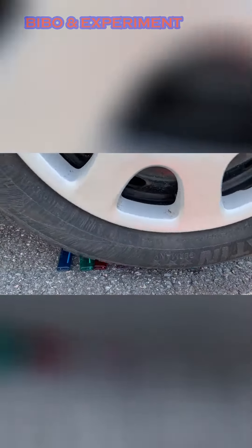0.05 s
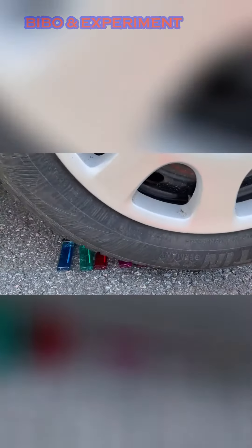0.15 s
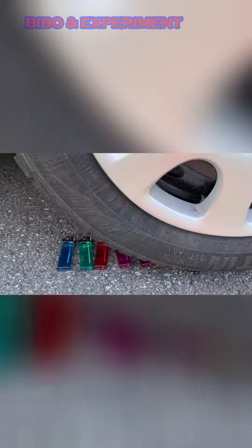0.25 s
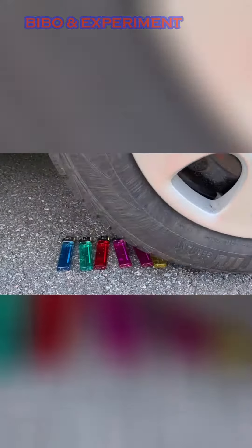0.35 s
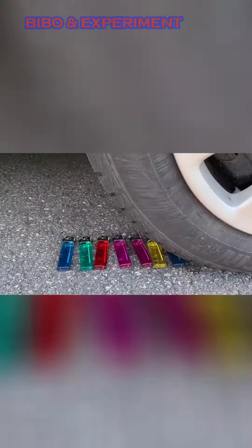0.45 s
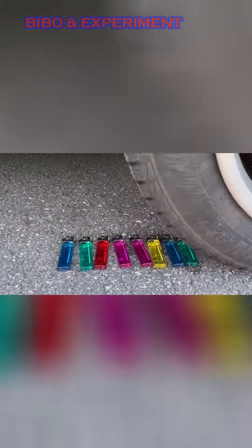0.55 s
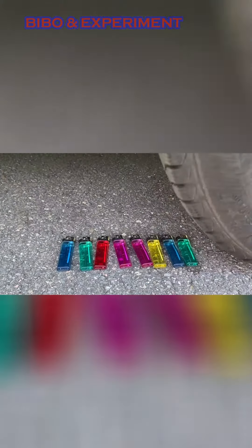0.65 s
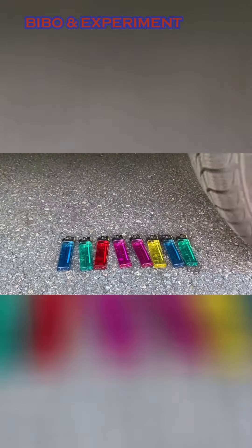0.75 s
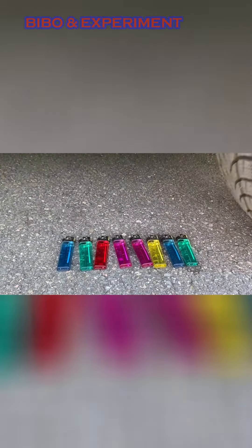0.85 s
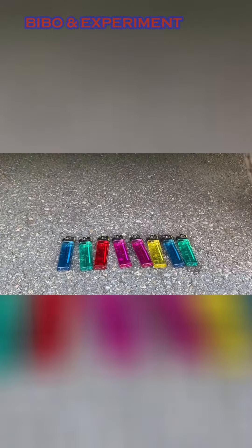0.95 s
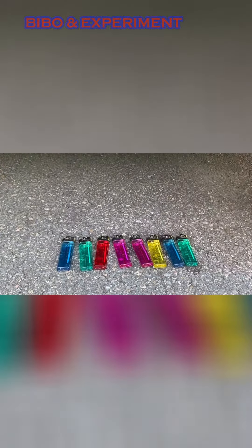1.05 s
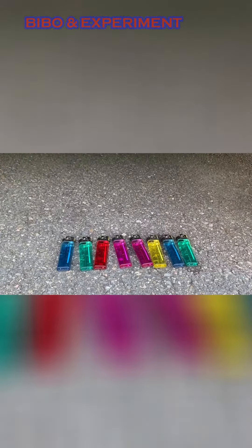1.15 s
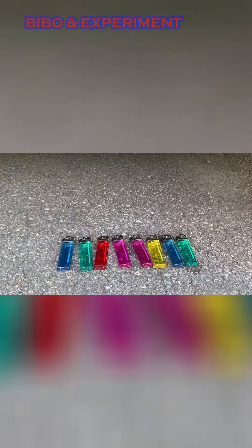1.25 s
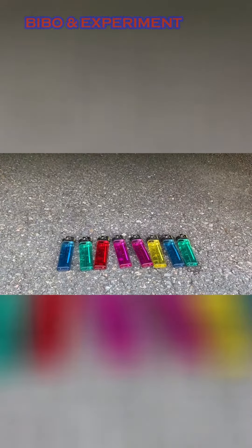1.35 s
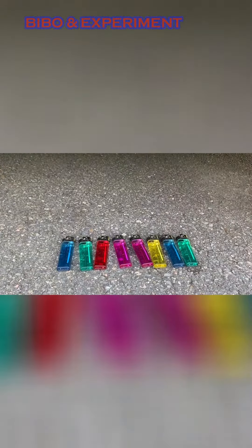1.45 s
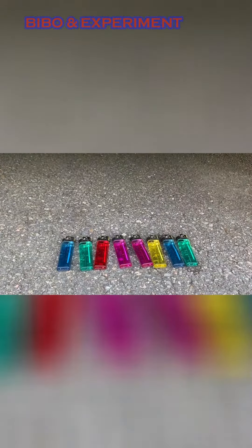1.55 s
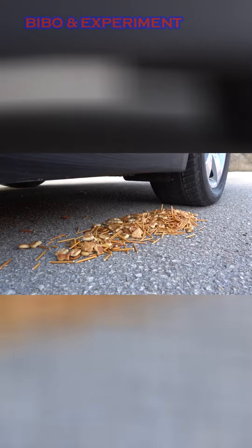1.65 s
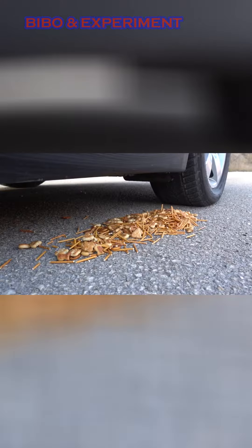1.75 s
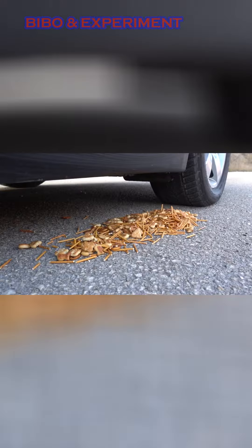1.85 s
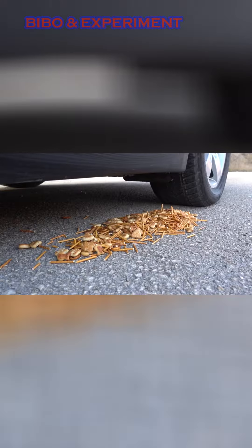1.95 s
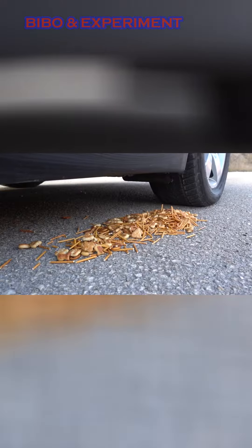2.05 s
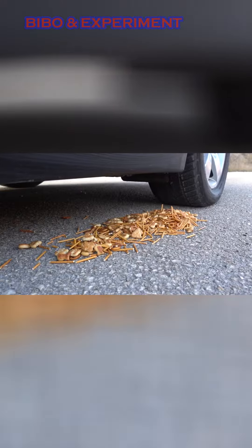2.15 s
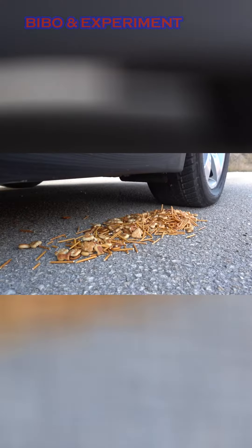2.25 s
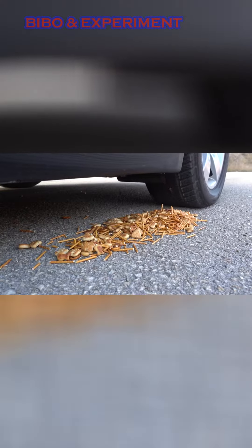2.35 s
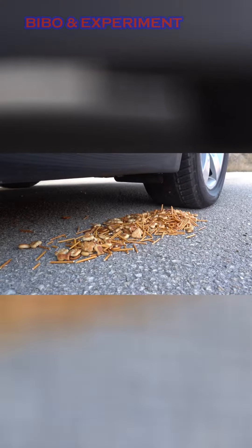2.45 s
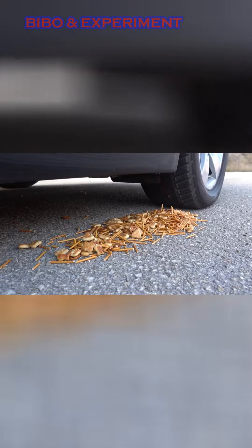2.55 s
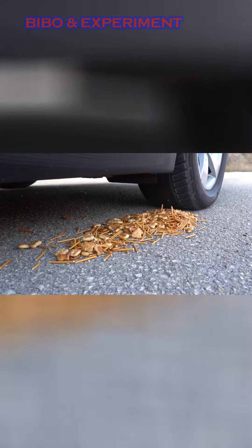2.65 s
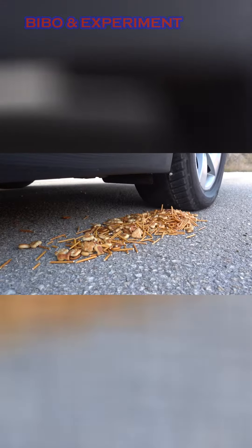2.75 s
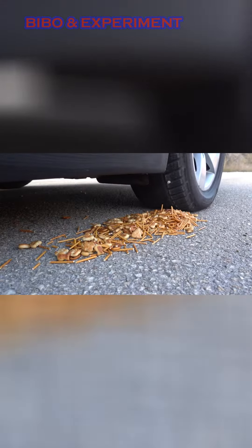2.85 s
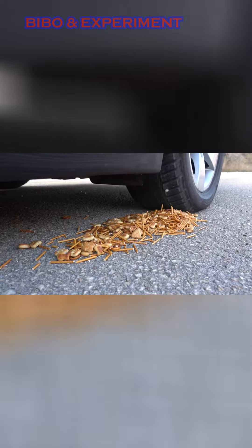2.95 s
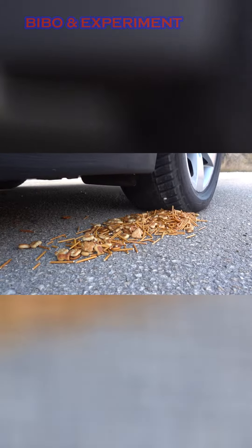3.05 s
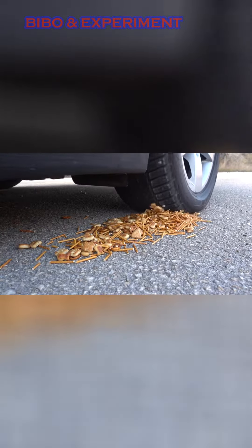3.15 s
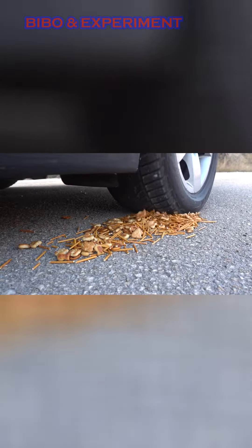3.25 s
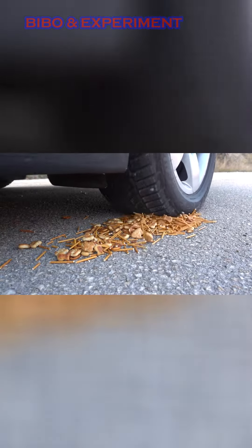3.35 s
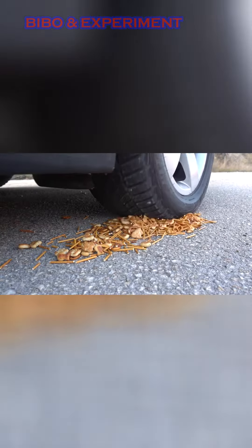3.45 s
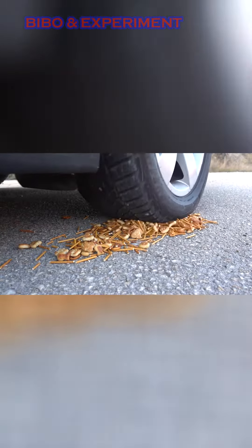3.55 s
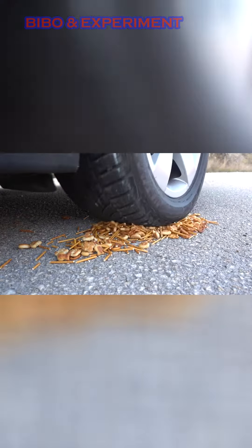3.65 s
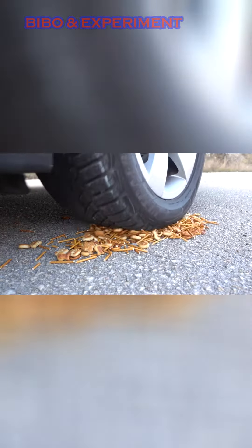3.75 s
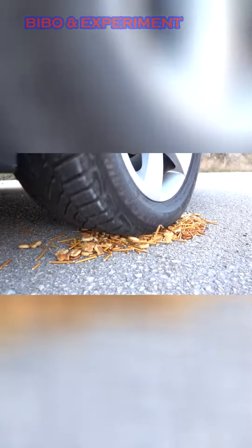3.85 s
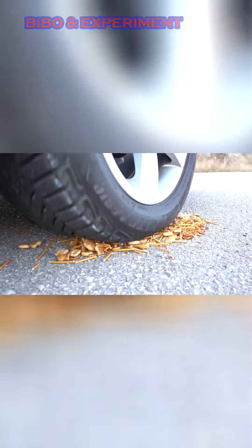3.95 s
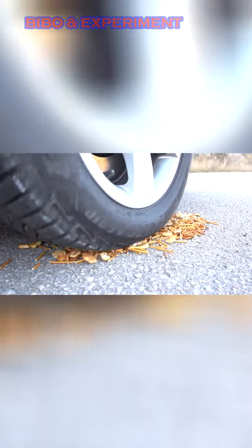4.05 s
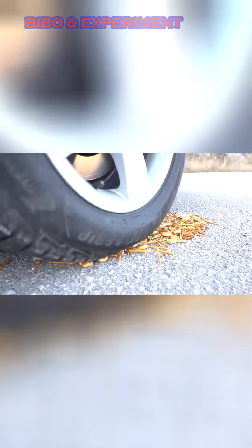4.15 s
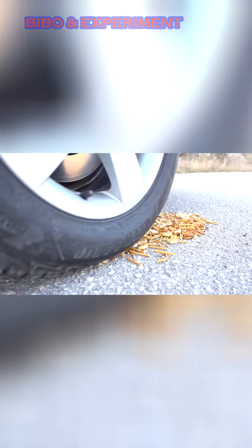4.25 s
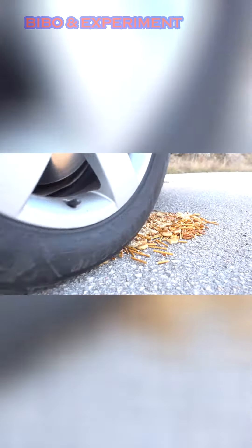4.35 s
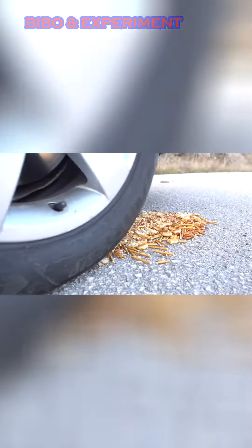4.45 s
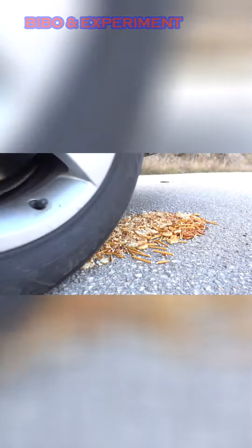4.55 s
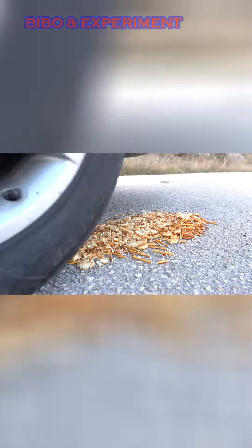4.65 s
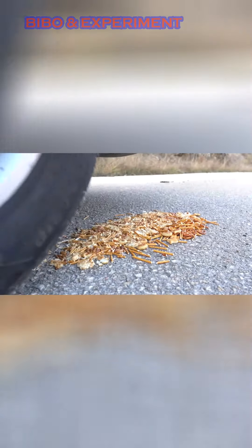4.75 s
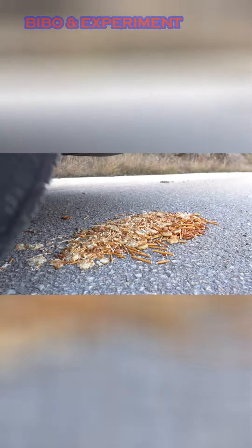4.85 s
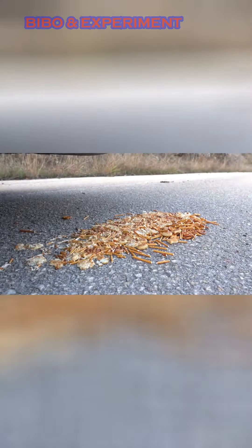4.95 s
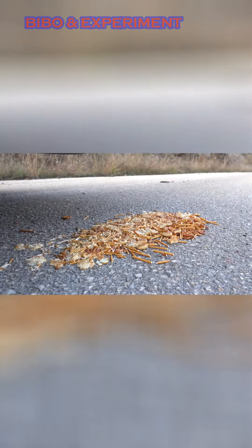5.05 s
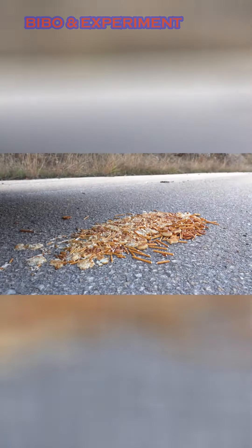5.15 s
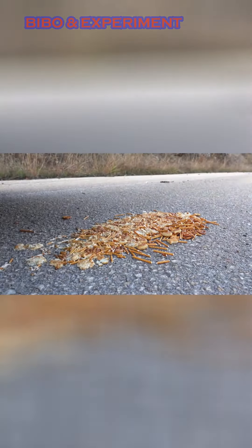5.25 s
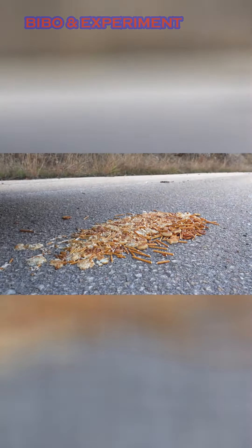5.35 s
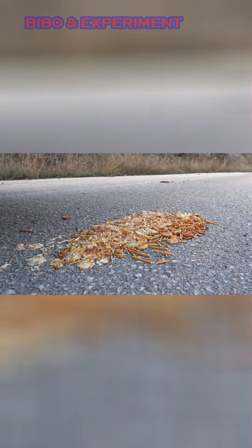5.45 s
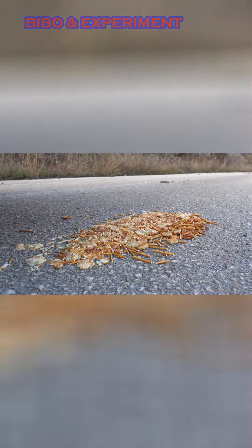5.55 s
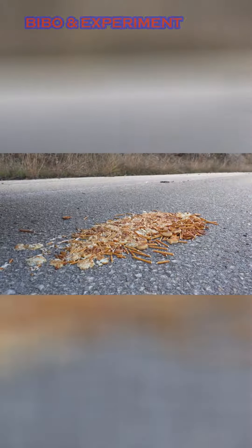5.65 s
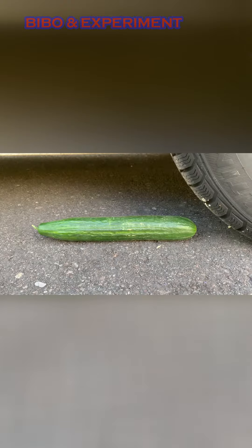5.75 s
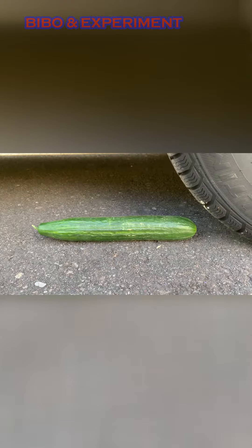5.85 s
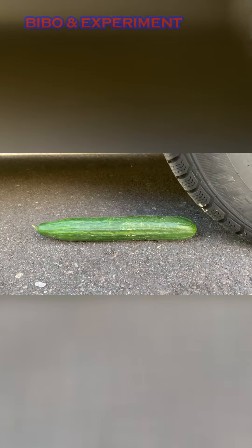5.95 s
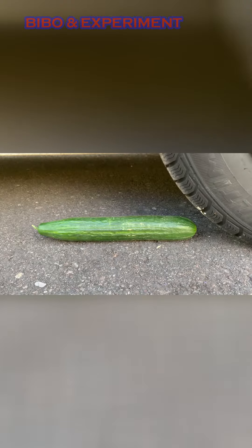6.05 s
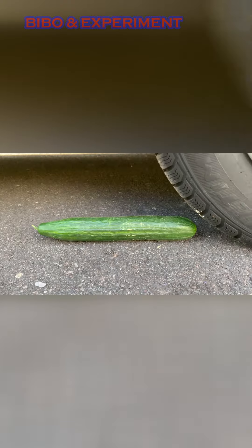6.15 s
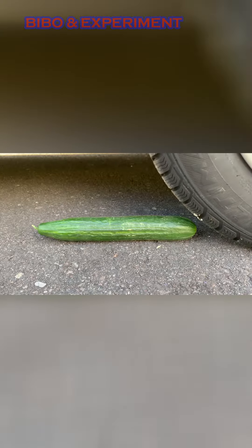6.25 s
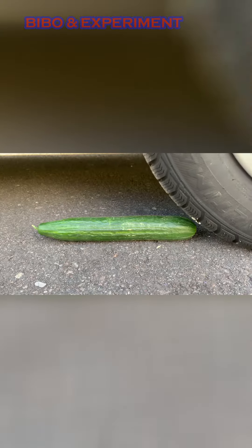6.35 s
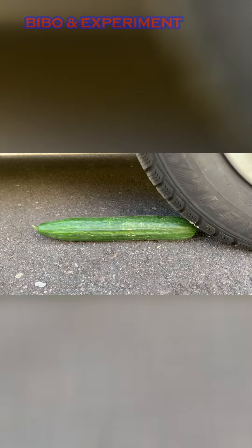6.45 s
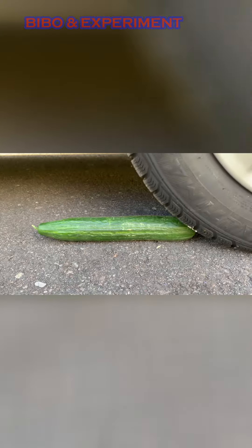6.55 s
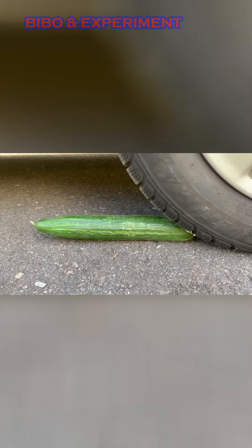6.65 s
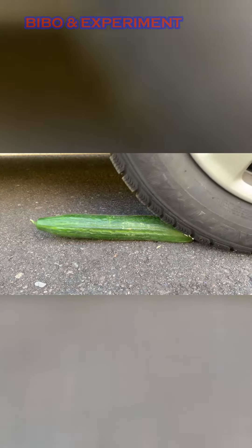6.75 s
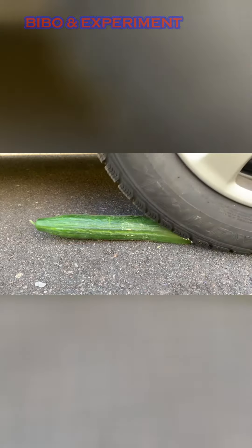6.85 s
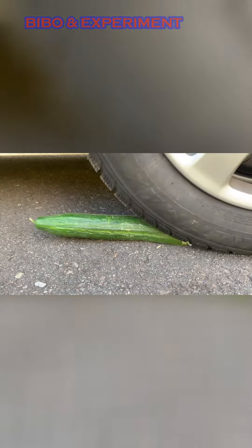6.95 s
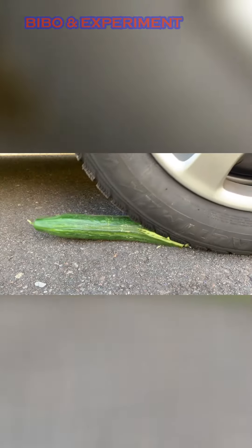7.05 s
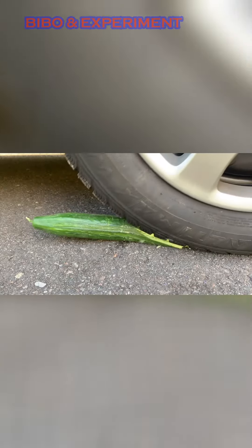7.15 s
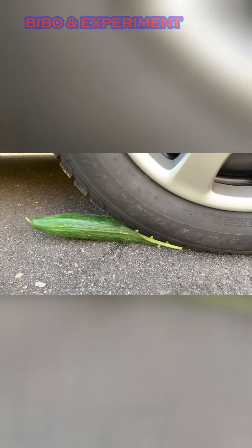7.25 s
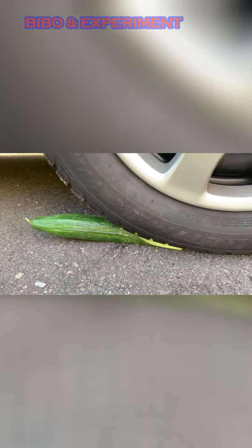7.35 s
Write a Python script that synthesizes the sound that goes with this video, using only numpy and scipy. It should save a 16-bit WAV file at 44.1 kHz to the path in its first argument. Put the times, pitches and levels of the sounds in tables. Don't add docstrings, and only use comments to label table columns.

```python
import sys
import numpy as np
from scipy import signal
from scipy.io import wavfile
from scipy.ndimage import uniform_filter1d

SR = 44100
rng = np.random.default_rng(int(sys.argv[2]) if len(sys.argv) > 2 else 0)


def to_linear_factor(level_db):
    exponent = np.asarray(level_db, float) / 20
    return 10 ** exponent


def inscribe(sig):
    pcm = np.round(np.clip(np.atleast_2d(sig).T, -1, 1) * 32767)
    wavfile.write(sys.argv[1], SR, pcm.astype(np.int16))


N = 325899

# start t/s, end t/s
LIGHTERS_SPAN = (0, 1.622)
SNACKS_SPAN = (1.655, 5.742)
CUCUMBER_SPAN = (5.771, 7.39)
BAND_EDGES_HZ = (30, 350, 2500, 16000)
# t/s, left minus right/dB
BALANCE = [(0.0, 3), (2.12, 2), (2.98, -2), (5.39, 3), (6.01, -0.5), (7.39, 0)]

# t/s, third firing multiple f/Hz, its level/dB, strain/dB
LIGHTERS_IDLE = [
    (0.0, 74.8, -31.5, 0),
    (0.054, 74.7, -33, -2),
    (1.606, 74.6, -32.5, -2),
    (1.62, 74.6, -32.5, -8),
]
CUCUMBER_IDLE = [(5.77, 74.4, -43.5, -10), (5.95, 74.26, -42, -4.5), (6.2, 74.7, -38.5, 3),
                 (6.4, 71.33, -42, -15), (6.6, 72.34, -39.5, -8), (6.75, 71.45, -45, -1),
                 (7.0, 72.1, -41, -1), (7.2, 71.6, -44, 9), (7.39, 72.4, -41, 5)]
# multiple of firing rate, level re third multiple/dB
LIGHTERS_TONES = [(1, -43), (2, -31), (4.35, -15), (5, -32), (7.6, -16.5), (10.2, -22.5), (15.2, -24.5),
                  (17.8, -22), (31, -25.5)]
CUCUMBER_TONES = [(1, -7), (2, -20), (4, -30), (5, 0.5), (6, 2.5), (7, -12), (8, -31), (9, -7.5),
                  (18, -12.5), (22, -20.5), (23, -11.5), (24, -9.5), (30.5, -17.5)]
STRAIN_SHARE = {5: 0.28, 6: 0.72}

# t/s, level/dB
LIGHTERS_BAY = [(0.0, -41), (1.448, -38), (1.62, -38)]
CUCUMBER_BAY = [(5.77, -43.5), (7.39, -44)]
CREEP_LEVEL = [
    (1.655, -62),
    (1.949, -62.5),
    (2.9, -51.5),
]
CRUNCH_LEVEL = [(2.89, -73), (2.898, -41), (3.02, -30.5), (3.07, -24), (3.2, -23.5), (3.35, -20.5),
                (3.5, -20), (4.2, -20), (4.38, -24), (4.415, -33), (4.46, -65)]
ROLL_LEVEL = [(4.4, -42), (4.62, -44), (5.568, -44), (5.74, -44)]
JUICE_LEVEL = [(6.52, -70), (6.62, -49), (6.72, -51), (6.8, -49), (6.92, -41.5), (6.99, -45), (7.02, -40.5),
               (7.05, -45.5), (7.39, -49.5)]
# rumble at loudest/dB, share followed, hiss at loudest/dB, share followed
LIGHTERS_BAY_LAW = (-37, 1.2, -47, 0.5)
CUCUMBER_BAY_LAW = (-37.5, 1, -62, 3.5)
CREEP_LAW = (-56, 0.2, -61.5, 0.26)
CRUNCH_LAW = (-31, 0.7, -24.5, 1.0)
ROLL_LAW = (-51, -1, -46, 1.25)
JUICE_LAW = (-49, -0.3, -43, 2.04)
# f/Hz, density/dB
LIGHTERS_BAY_COLOUR = [(18, -49), (30, -20), (77, -21.5), (137, -23.5), (187, -19.5), (299, -27.5),
                       (432, -19), (591, -21.5), (767, -21), (1590, -31.5), (2910, -28.5), (7080, -39.5),
                       (9190, -45.5), (10700, -38), (15500, -55)]
CUCUMBER_BAY_COLOUR = [(30, -25), (140, -4.5), (225, -21), (300, -26), (450, -23.5), (570, -18.5),
                       (655, -32), (750, -33.5), (1250, -34.5), (1450, -46), (3510, -48), (5250, -67),
                       (6100, -59), (7270, -60), (8660, -46.5), (12000, -67.5)]
CREEP_COLOUR = [(18, -41), (30, -16), (91, -7), (165, -15), (567, 2), (822, -6.5), (1380, -7),
                (11000, -21.5), (14300, -59), (22000, -120)]
SCUFF_COLOUR = [(18, -51), (30, -33), (140, 0.5), (181, -28), (258, -4), (311, -15.5), (954, -29.5),
                (8000, -75), (10400, -99), (17600, -120)]
CRUNCH_COLOUR = [(18, -59), (30, -44), (81, -4), (178, -9), (233, 2.5), (364, -8.5), (477, -4), (745, -5),
                 (1720, -12), (2100, -13.5), (5370, -22), (7780, -21), (11000, -24), (14300, -60),
                 (22000, -120)]
ROLL_COLOUR = [(18, -47), (30, -13), (81, -3.5), (182, -8.5), (233, -6), (412, -13), (709, -10), (842, -12),
               (2970, -17), (5370, -27), (11000, -31), (14300, -61), (22000, -120)]
JUICE_COLOUR = [(100, 21), (800, 4.5), (1700, -2), (3500, -4.5), (7000, -14), (8700, -6.5), (12000, -21),
                (15500, -22)]
# f/Hz, correlation
LIGHTERS_LIKENESS = [(60, 0.99), (180, 0.88), (550, -0.35), (1650, -0.23), (4970, 0.48), (15000, -0.19)]
CUCUMBER_LIKENESS = [(60, 0.32), (180, 0.68), (550, 0.55), (1650, -0.13), (4970, 0.43), (15000, -0.49)]
ROAD_LIKENESS = [(60, 1.0), (180, 1), (550, 0.94), (1650, 0.21), (4970, -0.48), (15000, -0.00095)]
CRUNCH_LIKENESS = [(60, 0.93), (180, 1), (550, 0.97), (1650, 0.85), (4970, 0.54), (15000, 0.12)]

# t/s, peak/dB, ring f/Hz, tick/dB, thump/dB
LIGHTER_TICKS = [
    (0.001, -27.5, 1130, 5.5, -8),
    (0.221, -42, 1180, -13, -12),
    (0.249, -32, 1060, 7, -30),
    (0.4718, -8.5, 840, -12.5, -9),
]
# start t/s, length/s, level/dB, rumble re level/dB
SLIPS = [
    (1.834, 0.27, -53, 13),
    (1.946, 0.081, -41.5, 12.5),
    (2.101, 0.064, -41, -7),
    (2.256, 0.042, -41, -4.5),
]
# t/s, peak/dB, ring f/Hz, tick/dB
PEBBLES = [(1.772, -47, 2560, -32), (1.3, -46, 3000, -32), (2.8, -47, 2600, -32), (2.7, -35, 2700, -28),
           (2.3306, -43, 1900, -32), (2.4309, -47, 2150, -32), (2.455, -50, 1700, -32),
           (2.493, -49, 2300, -32), (2.5097, -39, 2330, -24), (2.9, -46, 2290, -32),
           (2.6155, -31, 1910, -13), (2.4, -43.5, 2040, -32), (1.7, -49, 1780, -32), (1.4, -38, 1830, -32),
           (4, -34, 2230, -32), (2, -43, 2170, -32), (2.7462, -40, 2710, -32), (3.3, -40, 1900, -28.5),
           (2.805, -53, 1600, -32), (2.842, -47, 1460, -32)]
# t/s, peak/dB, ring f/Hz
STICK_SNAPS = [(2.899, -33, 480), (2.928, -34, 520), (2.95, -18.5, 570), (2.99, -24, 703),
               (3.012, -13, 835), (3.032, -10, 977), (3.062, -14, 760), (3.079, -19, 993),
               (3.079, -6.5, 655), (3.097, -7, 610), (3.126, -6, 790), (3.157, -5, 750), (3.176, -7, 720),
               (3.208, -13, 655), (3.222, -5.5, 800), (3.231, -8.5, 440), (3.261, -24, 401),
               (3.261, -11, 969), (3.276, -11, 454), (3.308, -18, 689), (3.332, -10, 1040),
               (3.361, -9, 457), (3.383, -13, 1410), (3.396, -11, 505), (3.428, -13, 545), (3.448, -8, 484),
               (3.492, -11, 805), (3.517, -7, 704), (3.534, -12, 872), (3.552, -14.5, 980),
               (3.569, -11, 1450), (3.58, -9, 826), (3.601, -10.5, 517), (3.615, -7.5, 530),
               (3.624, -10, 1160), (3.639, -10, 487),
               (3.659, -9, 754), (3.677, -10.5, 861), (3.703, -16, 1300), (3.731, -13.5, 743),
              (3.74, -12, 764), (3.789, -15.5, 790), (3.799, -11, 720), (3.837, -10, 1040),
              (3.868, -5, 1150), (3.883, -9, 1110), (3.901, -7, 970), (3.92, -16, 755), (3.94, -6, 1210),
              (3.958, -9, 790), (3.989, -10, 738), (4.025, -7, 856), (4.059, -12, 674), (4.074, -16, 816),
              (4.089, -13, 660), (4.122, -12, 851), (4.122, -8, 571), (4.148, -9.5, 1040),
              (4.168, -10, 1170), (4.202, -15, 650), (4.211, -14.5, 720), (4.221, -14, 555),
              (4.24, -14, 541), (4.271, -8, 620), (4.307, -8.5, 1320), (4.336, -10, 1010),
              (4.349, -10, 640), (4.377, -14, 608)]
# t/s, peak/dB
CRISPS = [(2.9503, -25), (3.0122, -24), (3.0316, -18), (3.0636, -23), (3.103, -8), (3.1614, -7.5),
          (3.2252, -26), (3.2786, -8.5), (3.3255, -20), (3.3978, -19), (3.5126, -8), (3.5714, -13),
          (3.662, -14), (3.7071, -9), (3.776, -8), (3.8308, -6.5), (3.9196, -21), (3.9371, -8), (3.977, -9),
          (4.1516, -29), (4.2494, -20), (4.2793, -25), (4.338, -22), (4.395, -21), (4.4384, -33)]
# t/s, peak/dB, ring f/Hz, tick/dB, thump/dB
GRIT = [(4.442, -24, 1870, -13, -10), (4.4745, -9.5, 1690, 0.5, -15.5), (4.499, -20, 1300, -30, -22),
        (4.521, -26, 2200, -22, -22), (4.5265, -24.5, 1500, -27, -7), (4.5725, -14.5, 1750, -35, -25),
        (4.6545, -25, 1340, -7, -21), (4.66, -22.5, 1360, -30, -11), (4.8885, -25, 1440, -25, 0),
        (4.8945, -21.5, 1510, -40, -7), (4.9025, -28, 2600, -25, -21), (5.12, -31, 1100, -20, -17),
        (5.1505, -26.5, 1510, -22, -5), (5.188, -25, 1500, -14, -12), (5.4025, -26.5, 2560, -20, -26),
        (5.454, -25, 1700, -20, -15), (5.5485, -29, 1380, -23, -10), (5.5655, -35, 1280, -13.5, 8),
        (5.5935, -7.5, 1820, -30, -18.5), (5.5975, -17.5, 1900, -28, -21), (5.686, -25.5, 1850, -25, -22),
        (5.7215, -23.5, 1700, -24, -20)]
# t/s, peak/dB, ring f/Hz, tick/dB, thump/dB
SPLITS = [(5.963, -39, 2600, -20, -5), (6.18, -32, 597, -30, -2), (6.6748, -40, 1560, -18, 12.5),
          (6.7575, -26, 2016, -20, -4), (6.776, -14, 1450, -15.5, 1), (6.8418, -18.5, 970, 0, 4.5),
          (6.8815, -2, 1520, -19, -5), (6.9071, -17, 1588, -27, -9), (6.9358, -6.5, 1350, -16, -1),
          (6.9421, -12, 1560, -19, -16), (6.9621, -23.5, 1994, -3, -17), (6.9812, -10.5, 2000, -24, -8.5),
          (6.985, -10.5, 1900, -21, -11), (7.001, -17.5, 1610, -12, -9), (7.0142, -23, 1690, 5, -5),
          (7.1205, -28.5, 1690, -9, -7), (7.1711, -23, 1551, -17, -19), (7.3297, -22, 1200, -12.5, -5.5),
          (7.3508, -27, 1897, -31, -7)]
# t/s, f/Hz, level/dB
SQUEAK = [
    (7.02, 2100, -62),
    (7.069, 1950, -49),
    (7.149, 1709, -52),
    (7.21, 1540, -42),
    (7.25, 1500, -66),
]
# f/Hz, width/Hz, level/dB
PORT = [(8410, 350, 11.5), (6070, 764, 4)]
# start t/s, end t/s, low f/Hz, high f/Hz, share of time
MUTED_BANDS = [(0, 1.63, 8300, 9600, .6), (0, 1.63, 12400, 14200, .92), (0, 1.63, 14200, 15600, .55),
               (5.76, 7.39, 6800, 7800, .6), (5.76, 6.75, 4600, 5650, .3), (5.76, 7.39, 10000, 11700, .4),
               (5.76, 7.39, 11700, 15600, .82)]


def read(points, hz):
    f, value = np.transpose(points)
    return np.interp(np.log(hz + 1), np.log(f + 1), value)


def evened(x):
    return x / np.sqrt(np.mean(x ** 2) + 1e-20)


def add(mix, start_s, sound):
    part = mix[:, round(start_s * SR):][:, :sound.shape[1]]
    part += sound[:, :part.shape[1]]


def drift(n, hz):
    low_pass = signal.butter(2, hz, fs=SR, output="sos")
    return evened(signal.sosfilt(low_pass, rng.standard_normal(n + 9000))[9000:])


def band_noise(shape, low_hz, high_hz, order):
    band = signal.butter(order, [low_hz, high_hz], "band", fs=SR, output="sos")
    return signal.sosfilt(band, rng.standard_normal(shape))


def below(x, hz):
    return signal.oaconvolve(x, signal.firwin(301, hz, window=("kaiser", 7), fs=SR)[None], "same")


def resonance(x, hz, width_hz):
    return signal.lfilter(*signal.iirpeak(hz, hz / width_hz, fs=SR), x)


def spread(pan_db):
    return to_linear_factor(pan_db * np.c_[[.5, -.5]])


def follow(control, law, rumble_db=0):
    s, db = np.transpose(control)
    low_db, low_share, high_db, high_share = law
    dip_db = db - db.max()
    return np.c_[s, low_db + low_share * dip_db + rumble_db, db, high_db + high_share * dip_db]


def grains(n, per_s, spread_db, cycles, shared):
    clumps = np.exp(.45 * drift(n, 60))

    def sizes():
        size_db = spread_db * np.minimum(rng.exponential(1, n), 3.2)
        return to_linear_factor(size_db) * (rng.random(n) < per_s * clumps / SR)

    together, out = sizes(), np.zeros((2, n))
    t = np.arange(1500) / SR
    for hz in np.geomspace(150, 12000, 12):
        train = shared * together * rng.standard_normal(n) + sizes() * rng.choice([-1, 1], n)
        t60_s = cycles / hz + 0.00027
        bit = np.sin(2 * np.pi * hz * t) * to_linear_factor(-60 * t / t60_s)
        second_path = bit * np.cos(t * hz * 4.2 + 0.13)
        out[0] += evened(signal.oaconvolve(train, bit)[:n])
        out[1] += evened(signal.oaconvolve(train, second_path)[:n])
    return out


def texture(rows, colour, likeness, grit=None, grit_share=0., patchy_db=1.5):
    s, *levels_db = np.transpose(rows)
    n = round((s[-1] - s[0]) * SR)
    frame = dict(fs=SR, nperseg=1024, noverlap=768)
    hz, t, z = signal.stft(rng.standard_normal((2, n)), **frame)
    if grit is not None:
        bits = signal.stft(grains(n, *grit), **frame)[2]
        bits_power = uniform_filter1d((abs(bits) ** 2).mean(2), 9, 1)
        bits = bits / np.sqrt(bits_power / (abs(z) ** 2).mean())[..., None]
        z = np.sqrt(grit_share) * bits + np.sqrt(1 - grit_share) * z
    shape_db = read(colour, hz)
    field_db = np.zeros(z.shape[1:])
    for low, high, level_db in zip(BAND_EDGES_HZ, BAND_EDGES_HZ[1:], levels_db):
        band = (hz >= low) & (hz < high)
        band_db = 10 * np.log10((to_linear_factor(shape_db[band]) ** 2).sum() / len(hz))
        field_db[band] = np.interp(t + s[0], s, level_db) - band_db
    field_db[hz < BAND_EDGES_HZ[0]] = field_db[1]
    field_db[hz >= BAND_EDGES_HZ[-1]] = field_db[370]
    patches = uniform_filter1d(uniform_filter1d(rng.standard_normal(field_db.shape), 10, 0), 10, 1)
    field_db = uniform_filter1d(field_db, 5, 0) + shape_db[:, None] + patchy_db * evened(patches)
    turn = np.arccos(np.clip(read(likeness, hz), -1, 1))[:, None] / 2
    middle, side = np.cos(turn) * z[0], np.sin(turn) * z[1]
    pair = np.array([middle + side, middle - side])
    sound = signal.istft(pair * to_linear_factor(field_db), **frame)[1][:, :n]
    return s[0], sound * spread(np.interp(s[0] + np.arange(n) / SR, *np.transpose(BALANCE)))


def engine(idle, tones, bay, wobble_db, jitter, throb, lag_turns, left_late_turns):
    start, noise = bay
    n = noise.shape[1]
    t = start + np.arange(n) / SR
    s, third_hz, level_db, strain_db = np.transpose(idle)
    firing_hz = np.interp(t, s, third_hz) / 3 * (1 + jitter * drift(n, 7.9))
    turns = np.cumsum(firing_hz) / SR
    heard = turns - np.c_[[left_late_turns, 0]]
    exhaust = 0
    for k, tone_db in [(3, 0)] + tones:
        db = np.interp(t, s, level_db + tone_db + STRAIN_SHARE.get(k, 0) * strain_db)
        wobble = wobble_db * (2.5 + k / 9) * drift(n, 5.4)
        exhaust = exhaust + to_linear_factor(db + wobble) * np.cos(2 * np.pi * k * heard)
    depth = throb * np.clip(1 + 0.5 * drift(n, 6.1), 0, 2)
    swell = np.exp(depth * np.cos(2 * np.pi * (turns - lag_turns)))
    return start, np.sqrt(2) * exhaust + noise * evened(swell)


def road_bounce(x, echo_db):
    t = np.arange(1500) / SR
    scatter = rng.standard_normal(1500) + 0.58 * rng.standard_normal((2, 1500))
    scatter = scatter * to_linear_factor(-60 * t / 0.049) * (t > .001)
    scatter = signal.lfilter(*signal.butter(1, [250, 3000], "band", fs=SR), scatter)
    scatter = scatter / np.linalg.norm(scatter[0])
    return x + to_linear_factor(echo_db) * signal.oaconvolve(x, scatter, axes=1)[:, :N]


def breaks(rows, t60_s, tick_t60_s, tick_hz, thump_hz, thump_t60_s, echo_db, pan_db,
           usual_tick_db=-17, glide=.6, pure=.7):
    out, t = np.zeros((2, N)), np.arange(2000) / SR
    n = len(t)
    tick_band = (tick_hz * .5, tick_hz * 1.67, 2)
    rise = np.clip(t / 0.0014, 0, 1)
    tear = to_linear_factor(-23 - 60 * t[400::-1] / 0.034)
    for row in rows:
        a, b = rng.random(2)
        s, db, hz, tick_db, thump_db = (*row, *(usual_tick_db, -15)[len(row) - 3:])
        burst = evened(band_noise(n, hz * .55, hz * 2.1, 3)) * to_linear_factor(-85 * t / t60_s)
        turns = hz * (t - glide * 0.00086 * np.exp(-t / 0.0013)) / (1 + glide * 0.27)
        partials = 1.36 * np.sin(2 * np.pi * turns) + 0.44 * np.sin(2 * np.pi * turns * (1.1 + .5 * a))
        body = pure * to_linear_factor(-60 * t / t60_s) * partials + 0.76 * burst
        sag_hz = thump_hz * (0.84 + 0.4 * b) * (1 + 2.71 * np.exp(-t / 0.00266))
        rumble = evened(band_noise(n, thump_hz * .45, thump_hz * 3.5, 2))
        thump = 0.77 * np.sin(2 * np.pi * np.cumsum(sag_hz) / SR) + 0.44 * rumble
        thump = thump * to_linear_factor(thump_db - 60 * t / thump_t60_s)
        tick = to_linear_factor(tick_db + 6.0 - 60 * t / tick_t60_s) * band_noise((2, n), *tick_band)
        add(out, s, to_linear_factor(db) * spread(pan_db) * (body + thump + tick) * rise)
        fibres = to_linear_factor(db + tick_db - 1) * tear * band_noise((2, len(tear)), *tick_band)
        add(out, max(s - len(tear) / SR, 0), fibres)
    return road_bounce(out, echo_db)


def lighters():
    mix = np.zeros((2, N))
    bay = texture(follow(LIGHTERS_BAY, LIGHTERS_BAY_LAW), LIGHTERS_BAY_COLOUR, LIGHTERS_LIKENESS)
    add(mix, *engine(LIGHTERS_IDLE, LIGHTERS_TONES, bay, wobble_db=0.64, jitter=0.0022, throb=0.15,
                     lag_turns=0.32, left_late_turns=0.0048))
    return mix + breaks(LIGHTER_TICKS, 0.011, 0.012, 5100, 235, 0.071, -17, 2.2, glide=1.1, pure=1.03)


def creep():
    return texture(follow(CREEP_LEVEL, CREEP_LAW), CREEP_COLOUR, ROAD_LIKENESS, patchy_db=1.)


def pebbles():
    return to_linear_factor(6) * breaks(PEBBLES, 0.0043, 0.0084, 8500, 489, 0.044, -6.5, -2.2, glide=0.56, pure=1.1)


def scuffs():
    s = np.arange(1.7, 2.39, .005)
    rest_db, hiss_db = -72, -35

    def slip(start, length, db, rise_s, sag_db, fall_s):
        return np.interp(s - start, [-rise_s, 0, length, length + fall_s],
                         [rest_db, db, db - sag_db, rest_db])

    level_db = np.max([slip(a, length, db, 0.0081, 4, 0.045) for a, length, db, _ in SLIPS], 0)
    wall_rise_s = 0.034
    low_db = np.max([slip(a + wall_rise_s / 2, length, db + rumble_db, wall_rise_s, 12.5, 0.15)
                     for a, length, db, rumble_db in SLIPS], 0)
    rows = np.c_[s, low_db, level_db, level_db + hiss_db]
    return texture(rows, SCUFF_COLOUR, ROAD_LIKENESS, (320, 3.3, 10.6, 0.45), 0.42)


def crunch():
    return texture(follow(CRUNCH_LEVEL, CRUNCH_LAW), CRUNCH_COLOUR, CRUNCH_LIKENESS,
                   (260, 0.7, 4.6, 0.75), 0.64)


def snaps():
    return to_linear_factor(1.0) * breaks(STICK_SNAPS, 0.019, 0.0064, 3300, 443, 0.019, -12, -0.56,
                             usual_tick_db=-9, glide=.3, pure=0.7)


def crisps():
    rows = [(s, db - 12, 3000, 12) for s, db in CRISPS]
    return breaks(rows, 0.0066, 0.0074, 6700, 400, .01, -2, -.7)


def roll():
    return texture(follow(ROLL_LEVEL, ROLL_LAW), ROLL_COLOUR, ROAD_LIKENESS,
                   (160, 3.2, 1.6, 1.3), 0.3, patchy_db=2.1)


def tyre_air(x):
    return to_linear_factor(-5) * 3 * resonance(x, 236, width_hz=8.9)


def tread_hum():
    from_peak_s = np.arange(N) / SR - 4.43
    rise_db_per_s, fall_db_per_s = 100, 25.5
    level_db = -38.5 + np.minimum(rise_db_per_s * from_peak_s, -fall_db_per_s * from_peak_s)
    hz = 231 + 2.45 * drift(N, 5.4)
    return to_linear_factor(level_db) * np.sin(2 * np.pi * np.cumsum(hz) / SR)


def grit():
    return breaks(GRIT, 0.0069, 0.0059, 5200, 331, 0.032, -10.5, 3.9, glide=.3, pure=1.05)


def snacks():
    mix = np.zeros((2, N))
    add(mix, *crunch())
    add(mix, *roll())
    mix += tyre_air(mix)
    mix += tread_hum()
    add(mix, *creep())
    add(mix, *scuffs())
    mix += pebbles() + snaps() + crisps() + grit()
    return below(0.66 * np.tanh(mix / 0.68), 11050)


def injector_whine():
    t = np.arange(N) / SR
    return np.sqrt(2) * to_linear_factor(-74) * np.sin(2 * np.pi * 5927 * t) * (t < 6.76)


def splits():
    dry_splits = breaks(SPLITS, 0.0066, 0.0097, 9200, 266.5, 0.037, -14, -1.7, glide=0.54, pure=0.94)
    ported = sum(to_linear_factor(db) * resonance(dry_splits, hz, width_hz) for hz, width_hz, db in PORT)
    treble = dry_splits - below(dry_splits, 5300)
    return ported + below(dry_splits, 4300) + to_linear_factor(-23.0) * treble


def squelch():
    s = np.transpose(JUICE_LEVEL)[0]
    burst_s, width_s, burst_db = 6.91, 0.11, 23
    swell_db = burst_db * np.exp(-((s - burst_s) / width_s) ** 2)
    return texture(follow(JUICE_LEVEL, JUICE_LAW, swell_db), JUICE_COLOUR, CUCUMBER_LIKENESS,
                   (93, 4.62, 10.0, 0.61), 0.63)


def squeak():
    s, hz, db = np.transpose(SQUEAK)
    t = np.arange(s[0], s[-1], 1 / SR)
    turns = np.cumsum(np.interp(t, s, hz) * (1 + 0.041 * drift(len(t), 24.94))) / SR
    fuzz = drift(len(t), 140)
    return s[0], to_linear_factor(np.interp(t, s, db)) * fuzz * np.cos(2 * np.pi * turns) * np.ones((2, 1))


def cucumber():
    mix = np.zeros((2, N))
    bay = texture(follow(CUCUMBER_BAY, CUCUMBER_BAY_LAW), CUCUMBER_BAY_COLOUR, CUCUMBER_LIKENESS)
    add(mix, *engine(CUCUMBER_IDLE, CUCUMBER_TONES, bay, wobble_db=.8, jitter=.003, throb=.35,
                     lag_turns=.05, left_late_turns=.003))
    mix += injector_whine() + splits()
    add(mix, *squelch())
    add(mix, *squeak())
    return 0.68 * np.tanh(mix / 0.62)


def cut(x, span):
    t = np.arange(N) / SR
    inside_s = np.minimum(t - span[0], span[1] - t)
    return x * np.clip((inside_s + .001) / .002, 0, 1)


def scene():
    return cut(lighters(), LIGHTERS_SPAN) + cut(snacks(), SNACKS_SPAN) + cut(cucumber(), CUCUMBER_SPAN)


def roll_off(x):
    return signal.sosfilt(signal.butter(12, 15660, fs=SR, output="sos"), x)


def record(dry):
    hz, t, z = signal.stft(below(dry, 15300), SR, nperseg=1024)
    step_hz = 450
    for start, end, low, high, share in MUTED_BANDS:
        span = (t > start) & (t < end)
        for edge in np.arange(low, high - 200, step_hz):
            band = (hz >= edge) & (hz < edge + step_hz)
            power = uniform_filter1d((abs(z[:, band]) ** 2).sum((0, 1)), size=2)
            quiet = span & (power < np.quantile(power[span], share))
            z[:, band] *= np.where(quiet, to_linear_factor(-38), 1)
    mix = signal.istft(z, SR, nperseg=1024)[1][:, :N]
    return roll_off(mix)


dry = scene()
out = record(dry)
inscribe(out)
```